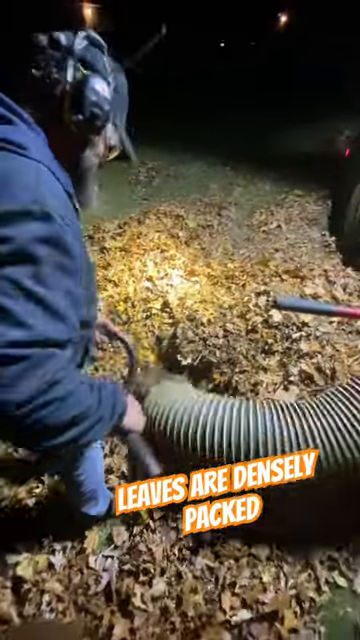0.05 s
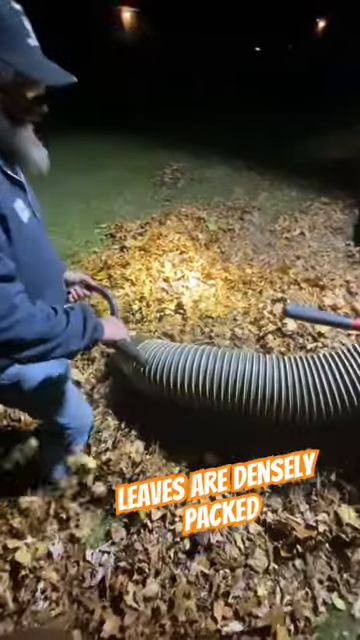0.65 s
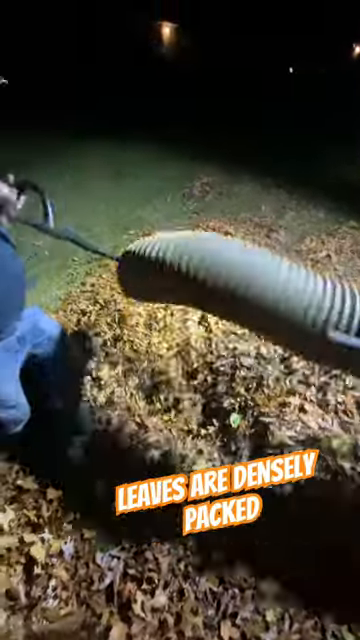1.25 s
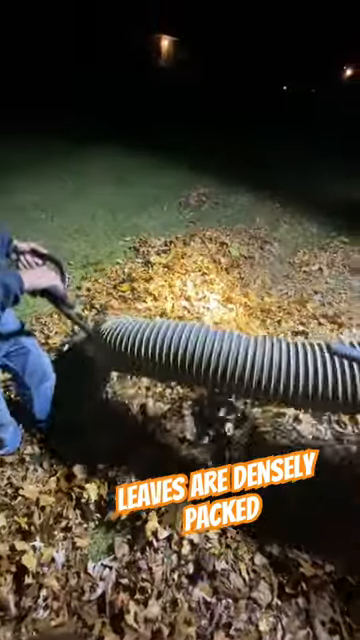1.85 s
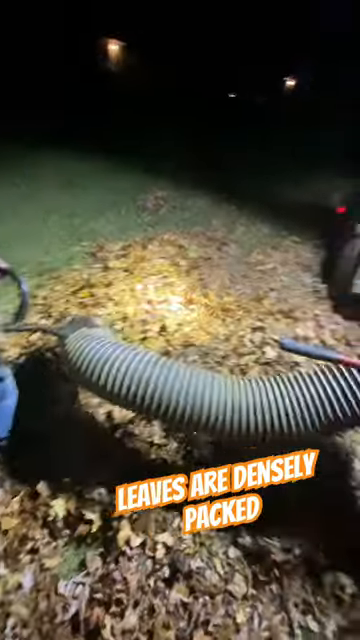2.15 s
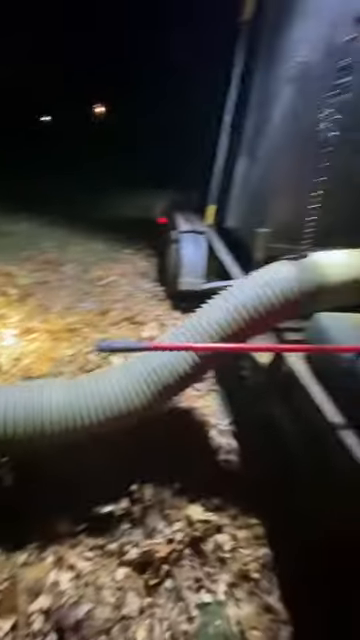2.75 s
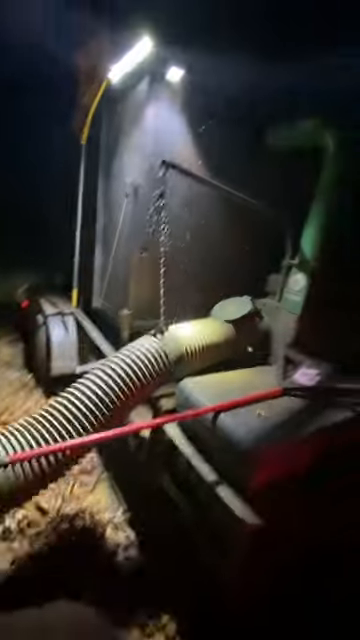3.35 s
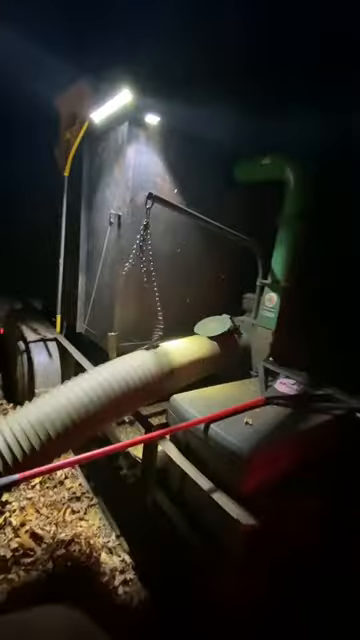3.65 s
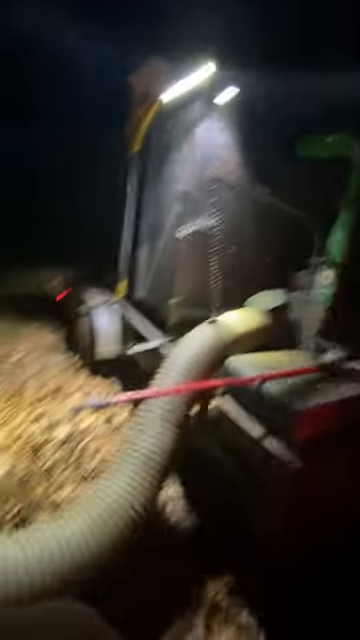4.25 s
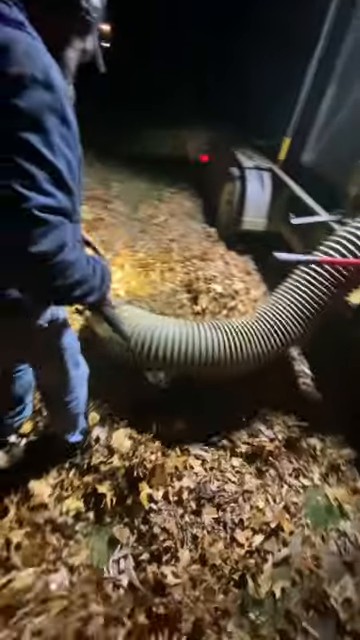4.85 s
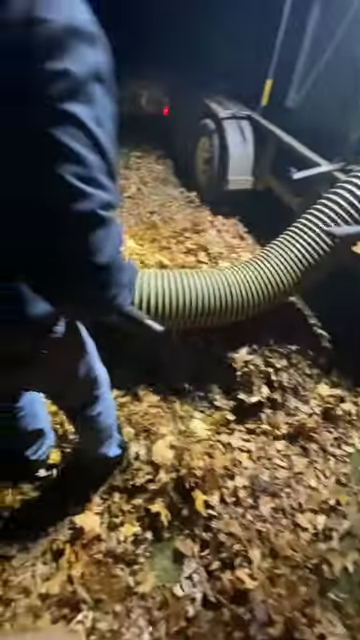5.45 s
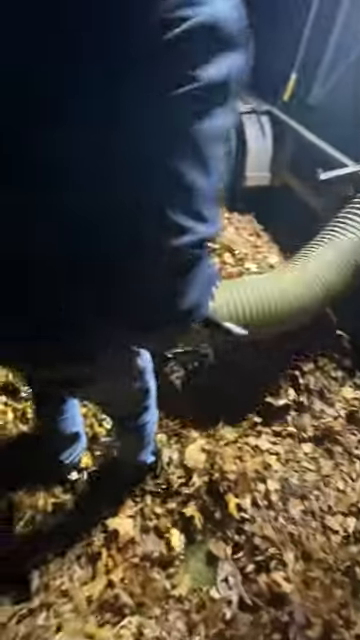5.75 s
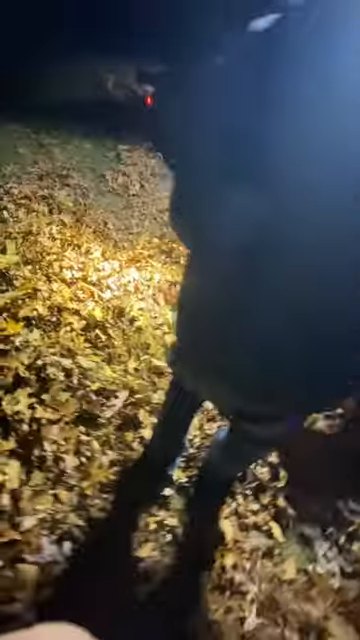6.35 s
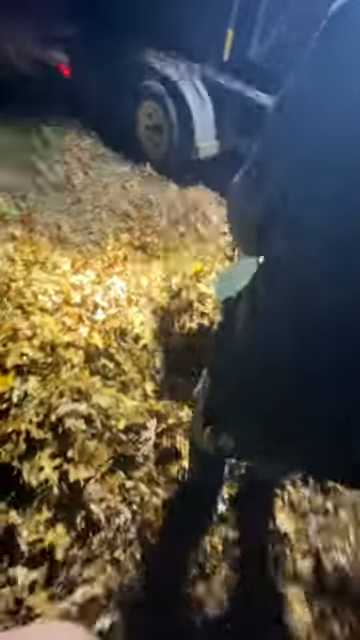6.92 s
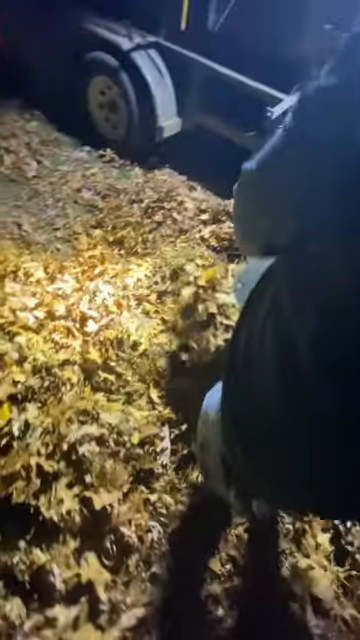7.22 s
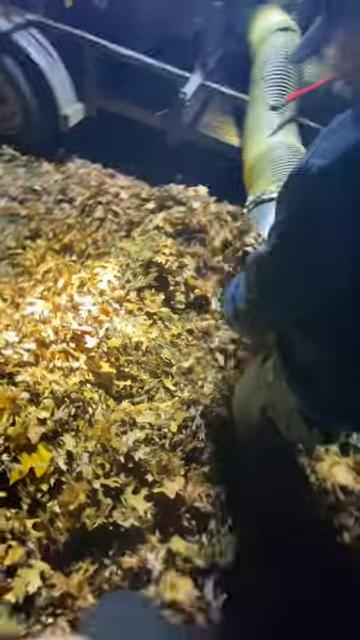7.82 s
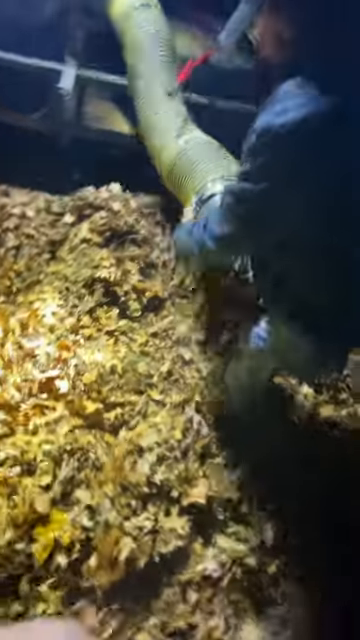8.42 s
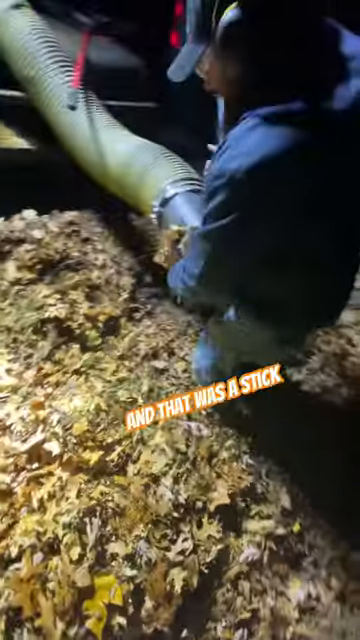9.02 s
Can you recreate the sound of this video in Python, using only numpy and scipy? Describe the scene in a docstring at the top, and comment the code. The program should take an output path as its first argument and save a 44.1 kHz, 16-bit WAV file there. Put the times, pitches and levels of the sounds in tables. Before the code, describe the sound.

An engine-driven leaf vacuum roars outdoors with a steady droning tone while dry leaves and twigs crackle up its hose.

```python
"""A trailer-mounted leaf vacuum at full throttle, its four-blade impeller singing one dominant tone.
A twin-cylinder engine chugs beneath it, and air roars and whistles through hose, housing and hopper.
Dry leaves hiss and crackle up the hose, twigs smash on the blades, and one big clump drags the speed down.
Heard from a few metres on a hand-held phone in a light breeze, walking from beside the impeller to
behind the man at the nozzle."""
import sys
import numpy as np
from scipy import signal
from scipy.fft import rfft, irfft
from scipy.io import wavfile
from scipy.ndimage import map_coordinates

SR = 44100
rng = np.random.default_rng(int(sys.argv[2]) if len(sys.argv) > 2 else 0)


def to_wav(sig):
    """Store sig (one row per channel, or 1-D mono) as 16-bit WAV at the path in sys.argv[1].

    Samples outside -1..1 are clipped; the rate is SR.
    """
    pcm = np.clip(np.atleast_2d(sig), -1, 1) * 32767
    pcm = np.round(pcm).astype(np.int16)
    wavfile.write(sys.argv[1], SR, pcm.T)  # frames by channels


N = 404838

# The blade tone at the microphone, swelling and fading with every step, then its second and third
# harmonics. Each row: time in seconds, level in dB.
BLADE_LEVEL = [(0.0, -27), (0.94, -26), (1.06, -20), (1.82, -24.5), (2.0, -20.5), (2.15, -19.5),
               (2.25, -32), (2.3, -21), (2.46, -16.5), (3.01, -16), (3.22, -20), (3.62, -16.5),
               (4.08, -24.5), (4.54, -18.5), (5.65, -22.5), (5.98, -31.5), (6.74, -28), (7.83, -28.5),
               (8.26, -25.5), (9.1, -25)]
SECOND_HARMONIC_LEVEL = [(0, -39.5), (1.3, -37.5), (3.5, -39.5), (5.5, -36.5), (6, -49), (6.6, -41),
                         (7.6, -50.5), (8.1, -55), (8.9, -50)]
THIRD_HARMONIC_LEVEL = [(0, -41), (2.7, -45.5), (3.6, -37.5), (4.6, -54), (5.501, -59), (6.4, -47),
                        (7.7, -54), (8.6, -40), (9.18, -41)]
BLADES_PER_CYCLE = 8  # four blades, two turns to an engine cycle
FREE_BLADE_HZ, LOAD_LAG_S = 235.7, .08  # blade rate with an empty hose; delay before a load tells on it

# The engine's lines, as multiples of the four-stroke cycle rate, then the relative level of each in dB
# from beside the impeller and from behind the man.
LINE_ORDERS = [2, 3, 4, 5, 6, 7, 9, 10, 11, 12, 13, 14, 15, 17, 18, 20, 22, 25, 28]
LINE_BESIDE_DB = [-2.5, -7, -8, -4.5, -12, -10.5, -16, -7.5, -20, -25, -13.5, -30, -18.5, -15.5, -19.5, -22,
                  -29, -31, -42]
LINE_BEHIND_DB = [0, -11.5, -19, -11.5, 3.5, -3, -4, -9, -4, -12.5, -14, -17, -16, -18, -35, -28, -16, -12,
                  -13]

# Spectra of exhaust, housing roar, hopper rush, leaf rustle and strikes.
# Each row: frequency in Hz, relative level in dB.
EXHAUST_SPECTRUM = [(30, -35), (55, -18), (95, -1), (135, -4.5), (190, -3), (270, -12.5), (400, -16),
                    (600, -30), (1200, -38), (2600, -21), (3300, -49)]
ROAR_SPECTRUM = [(80, -46), (180, 2), (270, 2), (360, 6.5), (420, -3), (480, 4.5), (550, -13), (690, -24),
                 (820, -8), (1500, -40), (4000, -53)]
HOPPER_SPECTRUM = [(250, -15), (600, 11), (800, 6.5), (1000, 5.5), (1400, 4.5), (2200, -4), (3200, -4),
                   (3900, -10.5), (5200, -8), (8000, -17), (11000, -14.5), (15000, -18)]
LEAF_SPECTRUM = [(500, -17), (1200, -6.5), (2000, 2), (2600, -1), (3200, 0.5), (3900, -1), (5200, 1.5),
                 (6500, 1.5), (8000, 0.5), (10000, 0), (12000, -3.5), (15500, -7.5)]
STRIKE_SPECTRUM = [(100, -37), (600, -2.5), (1300, 6), (2500, 6.5), (3800, 7), (5500, 7), (8000, 5),
                   (10500, 0.5), (13000, -6), (16000, -12)]

# The housing's roar and the hose's hollow ring along the walk. Each row: time in seconds, level in dB.
HOUSING_ROAR_LEVEL = [(0, -36.5), (1.2, -32), (2.2, -34), (2.7, -28), (3.7, -30.5), (4.55, -36), (5.4, -30),
                      (6, -35), (6.6, -35), (8.6, -39), (9.18, -35)]
HOSE_RING_LEVEL = [(0, -32.5), (1.9, -30.5), (3.8, -48.5), (4.6, -43), (6.1, -68), (7.3, -63), (7.9, -50),
                   (9.18, -42)]

# Resonances: air in the hose, air over the nozzle's rim, the struck hose wall, the struck steel, and the
# hose under the big clump. Each row: frequency in Hz, width in Hz, relative gain in dB.
HOSE_AIR_MODES = [(476, 65, 8), (607, 34, 3.5), (694, 40, 3.5), (830, 22, -2), (1290, 88, 0.5),
                  (1870, 240, -8.5), (2630, 290, -6.5)]
NOZZLE_RIM_MODES = [(2370, 390, 7.5), (2910, 280, -0.5), (3270, 520, 5.5), (4470, 1100, 5),
                    (5380, 310, 7.5), (6030, 210, 7)]
HOSE_WALL_MODES = [(1070, 77, -1), (1290, 57, -3), (2110, 95, 1.5), (3770, 160, -2.5), (4960, 170, 3)]
STEEL_MODES = [(1390, 75, -2), (2980, 150, 4.5), (4780, 160, -1), (5650, 280, 4.5)]
CLUMP_RING_MODES = [(1310, 69, 4.5), (1580, 36, 4), (2570, 132, -2.5), (4850, 250, -7)]

# Gulps of leaves up the hose.
# Each row: middle in seconds, half length in seconds, rustle in dB, drop in blade rate in Hz.
LEAF_GULPS = [(0.258, 0.48, -30, 11.1), (0.67, 0.3, -29, 3.8), (1.452, 0.59, -29, 6.3),
              (2.301, 0.09, -32, 4.4), (2.513, 0.18, -37.5, 3.6), (3.269, 0.61, -40, 8.3),
              (4.164, 0.14, -26.5, 0.86), (4.399, 0.51, -36.5, 6.75), (5.448, 0.247, -28, 5.54),
              (5.432, 1.23, -36.5, 3.13), (5.778, 0.12, -33.5, 0.33), (8.442, 1.01, -38, 2.77)]
CLUMP_S, CLUMP_HALF_LENGTH_S = 2.05, .035  # a packed clump slugs the impeller

# The loudest twigs and clumps on hose and blades. Each row: start in seconds, level in dB, length in
# seconds, brightness in dB per octave, what is hit from 0 (steel) to 1 (hose wall).
LOUD_STRIKES = [(.193, -23, 0.0047, 4, .6), (.226, -21.5, .004, 1, 0.39), (.243, -25, 0.0055, 3, 0.59),
                (.284, -24, 0.016, 3, 0.68), (.299, -24.5, 0.01, 1, .5), (.431, -21.5, 0.0072, 0, .5),
                (.484, -27.5, .012, -2, .8), (.523, -32, .005, -2, .5), (.556, -25, 0.0065, 1, 0.074),
                (.645, -23, 0.0057, 0.5, .9), (.717, -24, 0.0055, 1, .2), (.726, -20, 0.0036, 0, 1),
                (.738, -31, .012, -4, 0.88), (.785, -29.5, 0.0087, 4, .5), (.835, -28, .008, 4, .5),
                (.856, -26, 0.02, 4, .6), (.969, -23, .004, 1.5, 0.19), (1.066, -23, .012, 1.5, 0.47),
                (1.355, -29.5, 0.045, 2, 0.35), (1.49, -20.5, 0.0036, 7, .3),
                (1.544, -45, 0.0049, -5, 0.58), (1.61, -27, 0.0058, 0, 0.58),
                (1.855, -27.5, 0.0096, 0.5, 0.68), (1.974, -26, 0.021, 6, 0.42),
                (1.991, -18.5, .035, -1.5, 0.41), (2.03, -36, 0.029, 7, .3), (2.067, -22, 0.049, 1, 0.69),
                (2.433, -27, 0.0089, 12, .2), (2.474, -21.5, 0.0019, 8, .2), (2.522, -17.5, 0.0023, 8, .1),
                (2.67, -23, 0.0028, 9, 0.32), (2.808, -41, .005, 10, .2), (3.325, -37, 0.0038, 10, 0.19),
                (3.66, -18, 0.0061, 0, 0.72), (3.719, -15.5, 0.0037, 2, 0.57), (4.158, -29, 0.038, 16, .2),
                (4.178, -18.5, .014, 1.5, 0.19), (4.182, -24.5, 0.011, -11, 0.54),
                (4.205, -33, 0.055, -4, 0), (4.8, -27, 0.0038, 6, .3), (5.178, -20, 0.0029, 13, .3),
                (5.243, -27, 0.0078, 0, 0.43), (5.418, -23, 0.022, -1.5, .4), (5.446, -18.5, 0.014, .5, .3),
                (5.523, -34, 0.0044, 8, 0.52), (6.211, -20.5, 0.0046, 6.5, 0.015),
                (6.25, -36, 0.0018, 11, 0.023), (6.484, -42, 0.032, -.5, 0.32), (6.728, -40, 0.01, -3, .3),
                (6.91, -38.5, 0.042, 5, .1), (7.308, -35.5, 0.0042, 12, .1), (7.815, -38, 0.043, 5, 0.17),
                (8.083, -26, 0.0048, 3.5, 0.047), (8.234, -25, 0.0059, 5.5, 0.099),
                (8.248, -32.5, 0.013, 2, 0.019), (8.368, -28.5, 0.0033, 6, 0.14),
                (8.993, -30, 0.0026, 1, 0), (9.003, -42, .015, 4, .1)]
CRACK_HOLLOW = .55  # how much stalks and small twigs ring the hose wall

# The microphone's path. Each row: time in seconds, place from 0 (beside the impeller) to 1 (behind the
# man), facing the housing from 0 to 1, screened by the man from 0 to 1.
MIC_PATH = [(0, 0.083, 0.05, 0), (2.3, 0.068, 0.2, 0.13), (3.1, 0.18, 0.77, 0.13), (3.95, 0.38, 0.74, 0.04),
            (4.45, 0.0043, 0.21, 0.07), (5.5, 0.062, 0, 0.09), (6.1, 0.15, 0.25, 0.85),
            (6.9, 0.68, 0.2, 0.8), (8.1, 0.93, 0.05, 0.46), (9.18, 0.75, 0.06, 0.34)]

# How engine, hopper and rim reach the microphone. Each holds, in dB: level in the open, then the change
# when facing the housing, when screened by the man and when behind him.
ENGINE_PICKUP = (-32, 2.5, -5, -2.5)
HOPPER_PICKUP = (-32.5, 8, -11, -1)
RIM_PICKUP = (-30.5, -29, -16.5, -4)

# Whistles at the nozzle. Each row: frequency in Hz, width in Hz, then four pickup values in dB as above.
NOZZLE_WHISTLES = [(1860, 17, -57, -8, 5, -2), (3750, 160, -47.5, -7, -30, -6),
                   (2980, 350, -55, -5, -2.5, 15), (4880, 280, -61, -10, -11, 21),
                   (5670, 170, -55.5, 7, -10.5, 13.5), (6140, 270, -57.5, 1, 0, 3)]

# Gusts on the microphone. Each row: middle in seconds, half length in seconds, level in dB.
MIC_GUSTS = [(2.15, 0.42, -35), (7.75, 0.15, -48), (8.867, 0.16, -39)]

# How alike the phone's two microphone ports hear noise. Each row: frequency in Hz, likeness from 0 to 1.
PORT_LIKENESS = [(60, 0.9), (200, 0.9), (360, 0.9), (470, 0.47), (600, 0), (900, 0.42), (1330, 0.62),
                 (1800, 0.6), (5000, 0.37), (6400, 0.32), (7100, 0.96), (7650, 0.79), (9000, 0.4),
                 (9350, 1), (11500, 0.8), (11800, 0), (12450, 1)]
# Phase between the ports. Each row: frequency in Hz, lead of the left port in radians.
PORT_LEAD = [(0, 0), (400, 0), (540, .8), (700, -1), (1050, -.2), (1330, -1.3), (1600, .1), (2500, 1.5),
             (3300, 2.6), (3900, .6), (4650, 1.6), (5450, .5), (6500, 2.7), (7600, 3.25), (9800, 6.2),
             (11500, 6.5), (12600, 9.3), (14300, 9.55), (15300, 12.3)]
# Balance between the ports. Each row: frequency in Hz, left minus right in dB.
PORT_BALANCE = [(60, 0), (140, -1.5), (230, -2.5), (350, -5), (460, -8.5), (580, 2.5), (1000, 0.8),
                (1330, -0.5), (1700, 0), (4000, 0.5), (6000, -2), (8000, 0)]
TOP_HZ = 15800  # upper limit of the treble

TIME = np.arange(N) / SR
FREQ = np.arange(N // 2 + 1) * SR / N


def impeller(cycle):
    """Four blades sweep past the housing's tongue; ragged inflow shakes the overtones most."""
    phase = 2 * np.pi * BLADES_PER_CYCLE * cycle + .027 * walk(40)
    tone = unit(np.sin(phase) * undb(.63 * walk(50))) * undb(curves(BLADE_LEVEL)[0])
    for k, level in enumerate([SECOND_HARMONIC_LEVEL, THIRD_HARMONIC_LEVEL], start=2):
        overtone = np.sin(k * phase + .11 * k * walk(22)) * undb(2 * walk(10))
        tone = tone + unit(overtone) * undb(curves(level)[0])
    return tone


def blade_rate():
    """Each gulp slows the blades; the clump brakes them hard, then the governor brings them back."""
    sag_hz, brake_s, hold_s, governor_s = 16.5, .05, .13, .085
    load_hz = sum(drop_hz * swell(s + LOAD_LAG_S, half_s) for s, half_s, _, drop_hz in LEAF_GULPS)
    braked = np.clip((TIME - CLUMP_S) / brake_s + 1, 0, 1)
    unrecovered = np.exp(-np.maximum(TIME - CLUMP_S - hold_s, 0) / governor_s)
    return FREE_BLADE_HZ - load_hz - sag_hz * braked * unrecovered


def engine_lines(cycle, place):
    """Firing repeats every two turns; the muffler smears the beats into an even chug."""
    chug = 0
    for order, beside_db, behind_db in zip(LINE_ORDERS, LINE_BESIDE_DB, LINE_BEHIND_DB):
        waver_db = min(.15 * order, 2.2) * walk(7)  # higher lines are less steady
        db = beside_db + place * (behind_db - beside_db) + waver_db
        muffler_rad = .5 * (order - 8) ** 2
        phase = 2 * np.pi * order * cycle + muffler_rad + .012 * order * walk(14)
        chug = chug + np.sqrt(2) * undb(db) * np.cos(phase)
    return chug


def exhaust(cycle, place):
    """Two unevenly spaced puffs of gas in each cycle of the V-twin, a little softer behind the man."""
    second_firing = 3 / 8
    puffs = np.exp(-(cycle % 1) / .28) + 1.6 * np.exp(-((cycle - second_firing) % 1) / .29)
    return colour(noise() * (.58 + puffs), EXHAUST_SPECTRUM) * undb(-2 - place)


def air(cycle):
    """Air churns in the housing, throbbing with the shaft, and carries chopped leaves into the hopper."""
    throb = 1 + .1 * np.cos(2 * np.pi * 2 * cycle) + .05 * np.cos(2 * np.pi * cycle)
    roar = colour(noise() * throb, ROAR_SPECTRUM)
    roar_db = curves(HOUSING_ROAR_LEVEL)[0] + .79 * walk(3.4)
    rush = colour(noise() * throb * grains(rate=2300, spread_db=2.5, decay_s=.011), HOPPER_SPECTRUM)
    rush_db = heard_db(HOPPER_PICKUP) + .29 * walk(30)
    return roar * undb(roar_db) + rush * undb(rush_db)


def nozzle():
    """Inrushing air rings the flexing hose and sings over the rim; both flare as the clump passes."""
    hose = ringing(HOSE_AIR_MODES) * undb(curves(HOSE_RING_LEVEL)[0])
    rim = unit(turbulence_in(NOZZLE_RIM_MODES))
    rim_db = heard_db(RIM_PICKUP) + 1.3 * walk(18)  # wavers as leaves cover the opening
    flare_db = 4 * swell(CLUMP_S, half_length=.066)
    return (hose + rim * undb(rim_db)) * undb(flare_db)


def leaf_flow(trickle_db=-41.5):
    """Strength of the rustle: gulps on top of a steady trickle of loose leaves."""
    gulp_power = sum((undb(db) * swell(s, half_s)) ** 2 for s, half_s, db, _ in LEAF_GULPS)
    return np.sqrt(undb(trickle_db) ** 2 + gulp_power)


def leaves(flow):
    """Dry leaves scrape the hose ribs in clusters; stalks crack among them in six pitch ranges."""
    scrape = grains(rate=3500, spread_db=3.2, decay_s=.0009) * undb(1.6 * walk(45) + .9 * walk(14))
    cracks = 0
    for centre_hz in 1500 * 2 ** (np.arange(6) * .62):
        band = signal.butter(1, [centre_hz * .8, centre_hz * 1.2], "band", fs=SR, output="sos")
        cracks = cracks + signal.sosfilt(band, noise() * grains(rate=75, spread_db=4.4, decay_s=.0015))
    cracks = irfft(rfft(cracks) * (1 + CRACK_HOLLOW * struck(HOSE_WALL_MODES)), N)
    return colour(noise() * scrape + .6 * cracks, LEAF_SPECTRUM) * flow


def twigs(flow, place):
    """Rows like LOUD_STRIKES for random small twigs; behind the man they sink into the rustle."""
    per_s, length_s, db_per_octave = 14, .0077, 3
    offset_db, scatter_db, behind_db = -2.5, 2.5, -10
    count = int(per_s * N / SR)
    moments = (np.arange(count) + rng.random(count)) / per_s
    strength = np.interp(moments, TIME, flow * undb(behind_db * place))
    levels_db = 20 * np.log10(strength) + offset_db + scatter_db * rng.standard_normal(count)
    return [(s, db, length_s, db_per_octave, CRACK_HOLLOW) for s, db in zip(moments, levels_db)]


def debris(strikes, place):
    """Each twig or clump bursts into splinters that ring the hose wall or the steel, then rattle on."""
    rattle_share, rattle_s, crunch_s = .19, .038, .016
    size = 8192
    out = np.zeros((2, N + size))
    t, hz = np.arange(size) / SR, np.arange(size // 2 + 1) * SR / size
    splinters = np.tile(noise() * grains(rate=4000, spread_db=2.1, decay_s=.0004), 2)
    shreds = np.tile(noise() * grains(rate=4000, spread_db=1.2, decay_s=.0006), 2)
    octaves = np.log2(np.maximum(hz, 500) / 5000)
    steel, wall = struck(STEEL_MODES, hz), struck(HOSE_WALL_MODES, hz)
    strike_db = contour(STRIKE_SPECTRUM, hz)
    timbres = rng.standard_normal((len(strikes), 28))
    for (s, db, length_s, db_per_octave, hollow), timbre in zip(strikes, timbres):
        start = int(s * SR)
        attack_s, release_s = .031 * length_s, min(1.6 * length_s, .011)
        after = np.maximum(t - length_s, 0)
        decay = np.exp(-after / release_s) + rattle_share * np.exp(-after / rattle_s)
        envelope = (1 - np.exp(-t / attack_s)) * decay
        snap = np.exp(-length_s / crunch_s)  # short strikes snap, long ones shred evenly
        pieces = snap * splinters[:, start:start + size] + (1 - snap) * shreds[:, start:start + size]
        burst = unit(pieces * envelope) * np.sqrt(np.mean(envelope ** 2))
        timbre_db = 1.6 * np.interp(hz, np.linspace(0, TOP_HZ, len(timbre)), timbre)
        steel_db = -7.5 + 17.5 * place[start]  # behind the man the microphone is close to the nozzle
        ring = hollow * wall + (1 - hollow) * steel * undb(steel_db)
        response = undb(strike_db + db_per_octave * octaves + timbre_db) * (1 + ring)
        response /= np.sqrt(np.mean(np.abs(response) ** 2))
        out[:, start:start + size] += undb(db) * irfft(rfft(burst) * response)
    return out[:, :N]


def thud():
    """The big clump thumps the housing and rings the hose."""
    spectrum = [(40, -20), (80, 0), (170, -1), (300, -12), (450, -6), (900, -24), (4000, -60)]  # Hz, dB
    thump = colour(noise(), spectrum) * swell(CLUMP_S, CLUMP_HALF_LENGTH_S)
    ring = unit(turbulence_in(CLUMP_RING_MODES)) * swell(CLUMP_S + CLUMP_HALF_LENGTH_S / 2, .079)
    return undb(-24) * (thump + ring)


def whistle():
    """Breathy whistles waver as leaves pass the opening; most come forward behind the man."""
    flutter = undb(1.4 * walk(11.4))
    return flutter * sum(ringing([(hz, width, 0)]) * undb(heard_db(pickup))
                         for hz, width, *pickup in NOZZLE_WHISTLES)


def wind(breeze_db=-46):
    """Low buffeting on the moving microphone: a light breeze and a few gusts."""
    buffet = colour(noise(), [(15, -22), (40, -9), (70, 0), (150, -8), (600, -56)])
    strength = undb(breeze_db) + sum(undb(db) * swell(s, half_s) for s, half_s, db in MIC_GUSTS)
    return buffet * strength * undb(2.5 * walk(12))


def heard_db(pickup):
    """A layer's level as the microphone faces the housing, is screened by the man or goes behind him."""
    open_db, facing_db, screened_db, behind_db = pickup
    place, facing, screened = curves(MIC_PATH)
    return open_db + facing * facing_db + screened * screened_db + place * behind_db


def shielded(x, place):
    """The man's body takes the top off a sound as the microphone moves behind him."""
    dull = signal.sosfilt(signal.butter(1, 6500, fs=SR, output="sos"), x)
    return x + place * (dull - x)


def ports(tones, turbulence):
    """Two microphone ports hear the bass alike, the treble partly alike, with a lag across the phone."""
    likeness = contour(PORT_LIKENESS)
    shared, apart = rfft(turbulence)
    side = np.array([[1], [-1]])  # left, right
    heard = rfft(tones) + shared * np.sqrt((1 + likeness) / 2) + side * apart * np.sqrt((1 - likeness) / 2)
    lead = np.interp(FREQ, *np.transpose(PORT_LEAD))
    return irfft(heard * np.exp(.5j * side * lead) * undb(side * contour(PORT_BALANCE) / 2), N)


def noise():
    """Turbulence in two parts: what the ports share and what they do not."""
    return rng.standard_normal((2, N))


def turbulence_in(modes):
    """Turbulence through steep-sided resonances."""
    gain = sum(undb(db) / (1 + (1.9 * (FREQ - centre) / width) ** 2) for centre, width, db in modes)
    return irfft(rfft(noise()) * gain, N)


def ringing(modes, bend=.012):
    """Turbulence in a set of resonances whose pitch wanders by the share bend."""
    sound = turbulence_in(modes)
    position = np.cumsum(1 + bend * walk(4))
    return unit(np.array([map_coordinates(part, [position], mode="mirror") for part in sound]))


def struck(modes, hz=FREQ):
    """Response of (Hz, width, dB) resonances that ring on after a blow."""
    return sum(undb(db) / (1 + 2j * (hz - centre) / width) for centre, width, db in modes)


def grains(rate, spread_db, decay_s):
    """Envelope of many small impacts of very unequal size, each dying quickly."""
    chance, size = rng.random(N), np.minimum(rng.exponential(size=N), 5)
    power = (chance < rate / SR) * undb(spread_db * size) ** 2
    return unit(np.sqrt(signal.lfilter([1], [1, -np.exp(-1 / (decay_s * SR))], power)))


def walk(rate):
    """Smooth chance of spread 1 that changes about rate times a second."""
    size, step_hz = 8192, 800
    hz = np.arange(size // 2 + 1) * step_hz / size
    slow = irfft(rfft(rng.standard_normal(size)) / (1 + (2 * hz / rate) ** 4))
    return unit(np.interp(TIME, np.arange(size) / step_hz, slow))


def swell(s, half_length):
    """A smooth rise and fall of height 1 around time s."""
    return np.exp(-((TIME - s) / half_length) ** 2)


def colour(x, points):
    """Give a signal a spectrum that dies away above its last point, at rms 1."""
    fade = 1 / (1 + (FREQ / (1.15 * points[-1][0])) ** 6)
    return unit(irfft(rfft(x) * undb(contour(points)) * fade, N))


def contour(points, hz=FREQ):
    """Read (Hz, value) points on a log-frequency axis."""
    f, value = np.transpose(points)
    return np.interp(np.log(hz + 1), np.log(f + 1), value)


def curves(table):
    """The columns of a table as smooth controls over time."""
    s, *columns = np.transpose(table)
    return [np.interp(TIME, s, c) for c in columns]


def unit(x):
    """Scale to rms 1."""
    return x / np.sqrt(np.mean(x ** 2))


def undb(db):
    """Decibels to gain."""
    return 10 ** (np.asarray(db) / 20)


def scene():
    """One shaft drives engine, blade tone and air flow; the leaves it swallows rustle and slow it."""
    place = curves(MIC_PATH)[0]
    engine_gain = undb(heard_db(ENGINE_PICKUP))
    flow = leaf_flow()
    cycle = np.cumsum(blade_rate()) / SR / BLADES_PER_CYCLE  # engine cycles elapsed
    tones = impeller(cycle) + engine_lines(cycle, place) * engine_gain
    airflow = exhaust(cycle, place) * engine_gain + air(cycle) + whistle()
    suction = nozzle() + shielded(leaves(flow), place)
    impacts = debris(LOUD_STRIKES + twigs(flow, place), place) + thud()
    return ports(tones, airflow + suction + impacts + wind())


def record(dry):
    """The few loudest cracks are softly rounded and the highest treble is cut."""
    ceiling, hardness = .85, 6
    rounded = dry / (1 + np.abs(dry / ceiling) ** hardness) ** (1 / hardness)
    return signal.sosfilt(signal.ellip(10, .2, 80, TOP_HZ, fs=SR, output="sos"), rounded)


dry = scene()
out = record(dry)
to_wav(out)
```